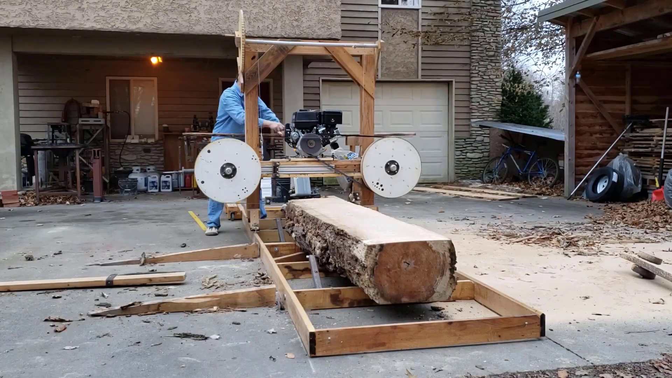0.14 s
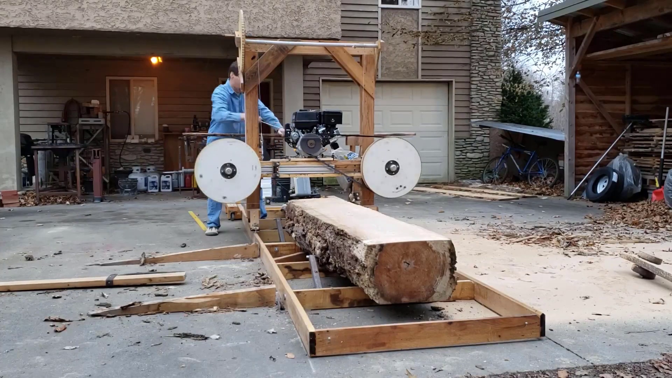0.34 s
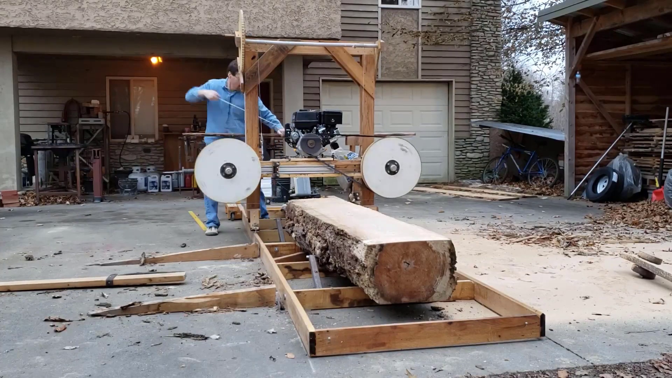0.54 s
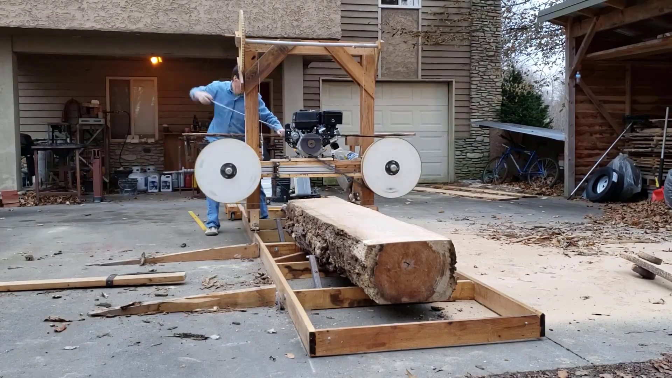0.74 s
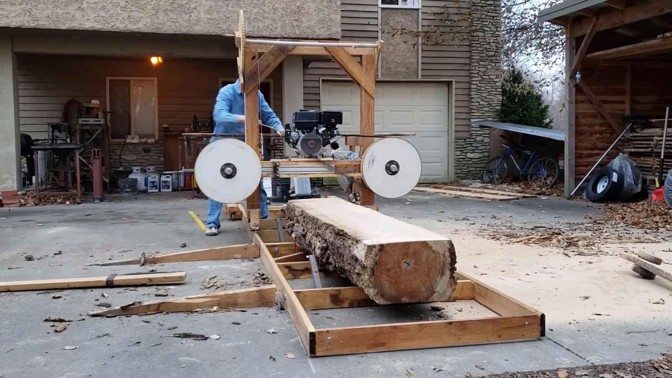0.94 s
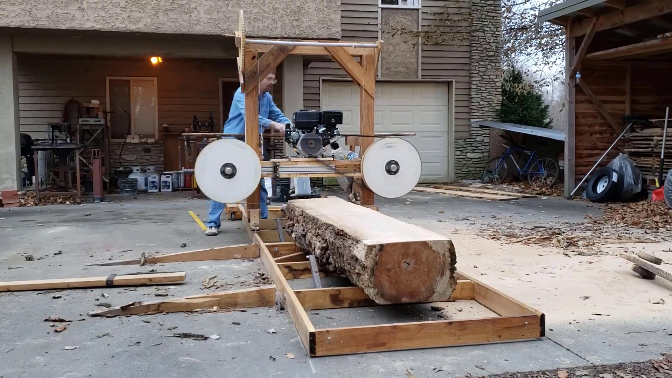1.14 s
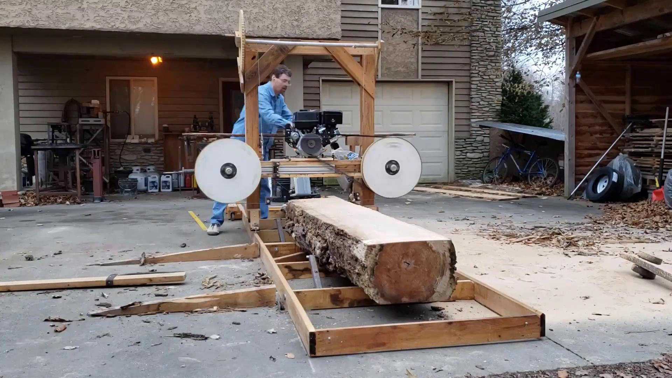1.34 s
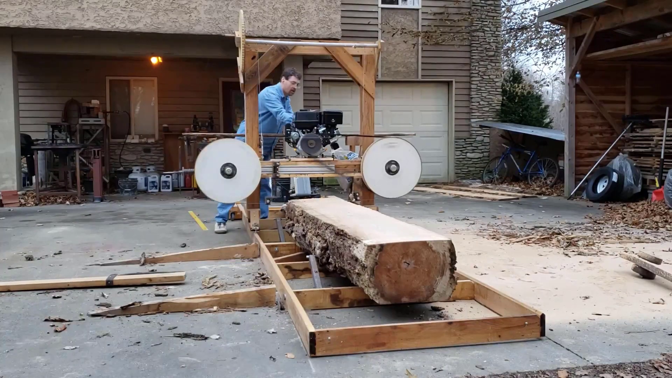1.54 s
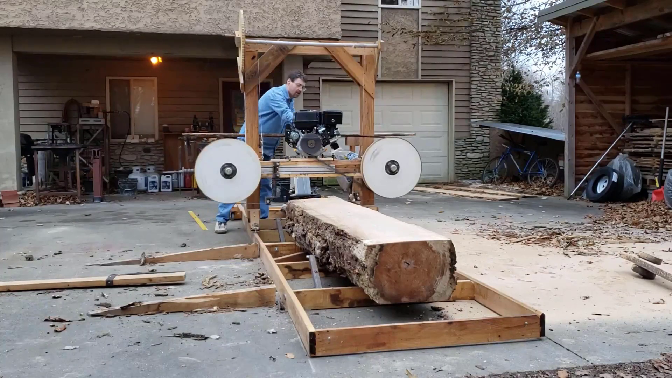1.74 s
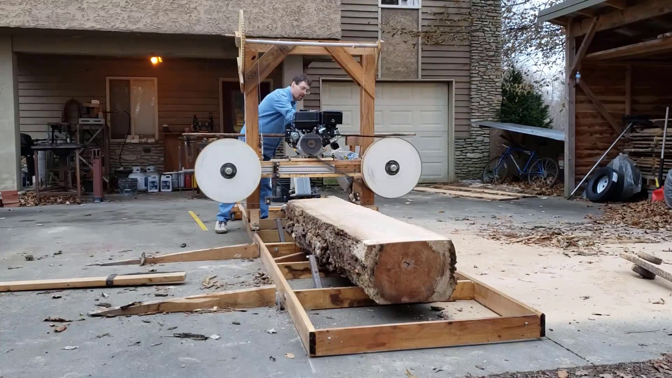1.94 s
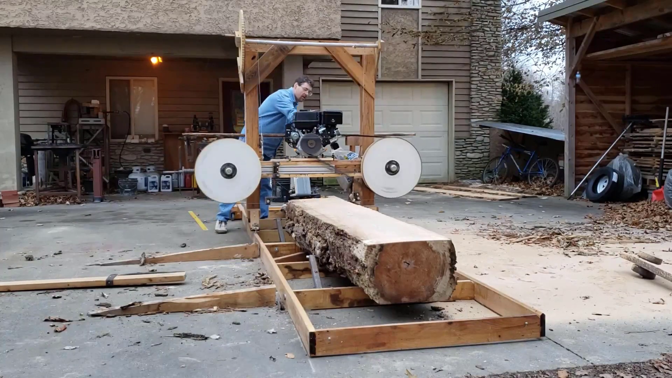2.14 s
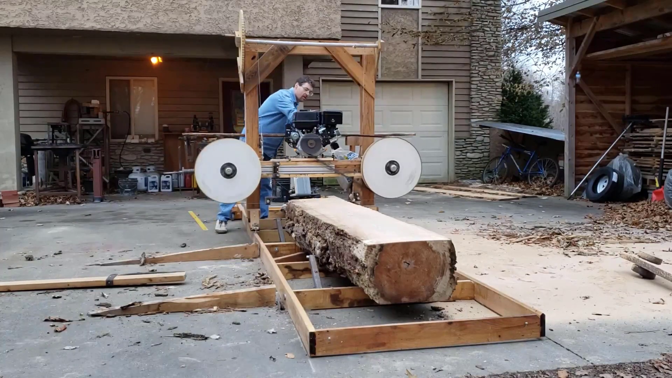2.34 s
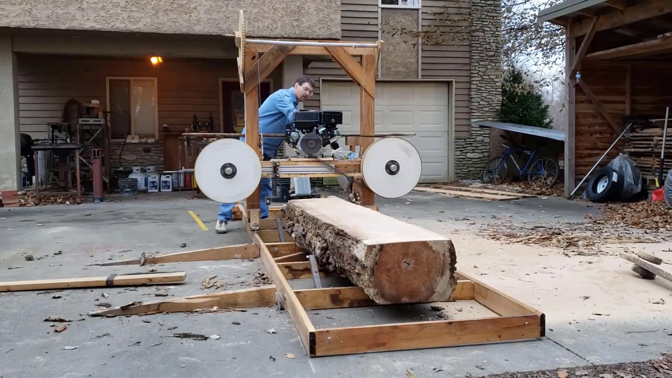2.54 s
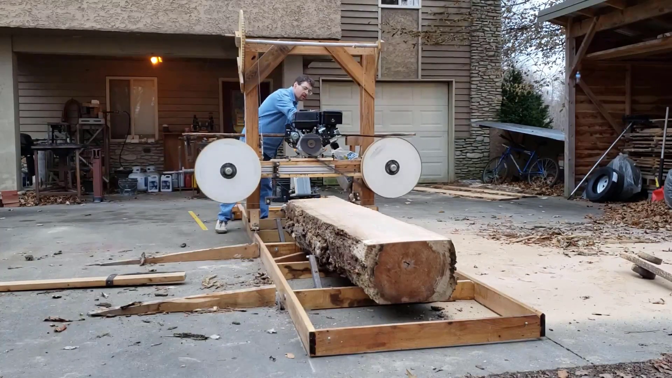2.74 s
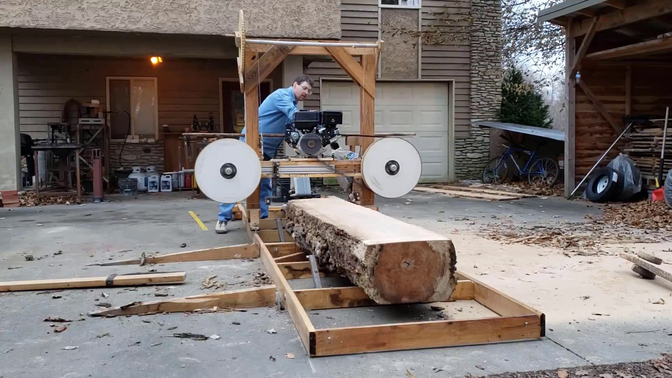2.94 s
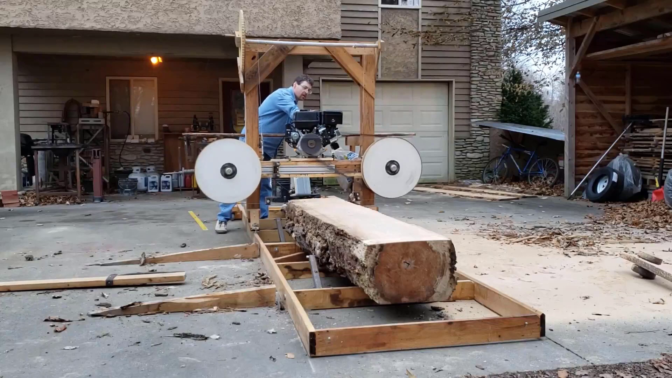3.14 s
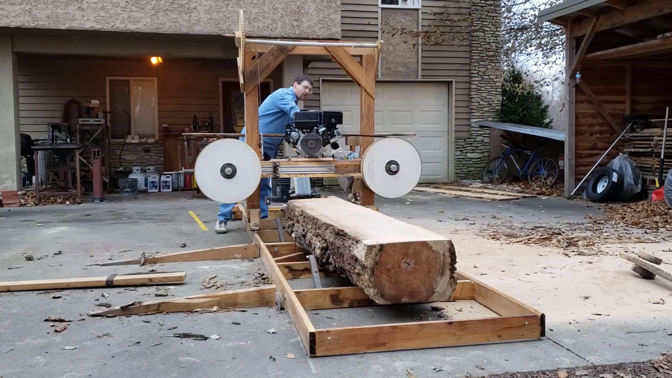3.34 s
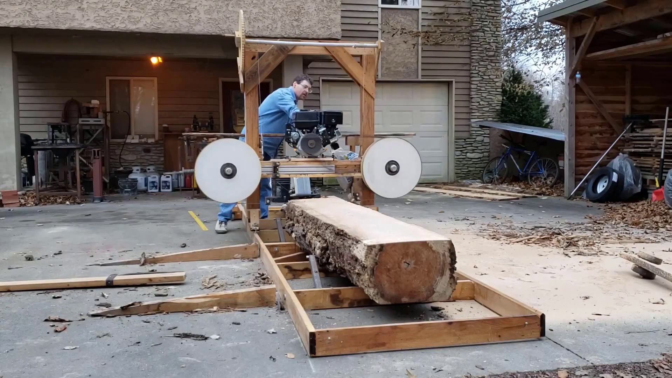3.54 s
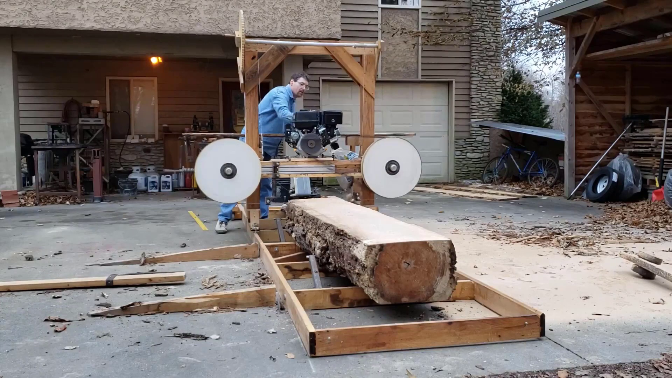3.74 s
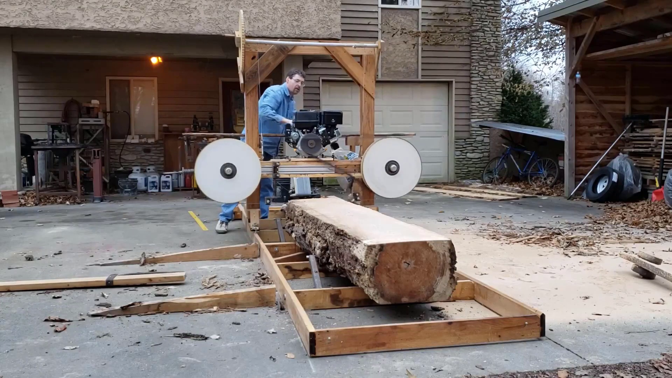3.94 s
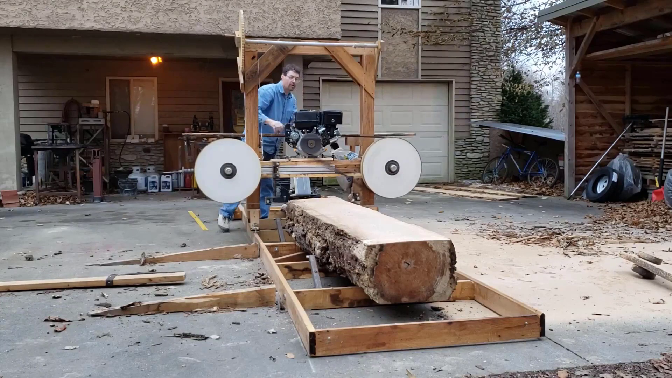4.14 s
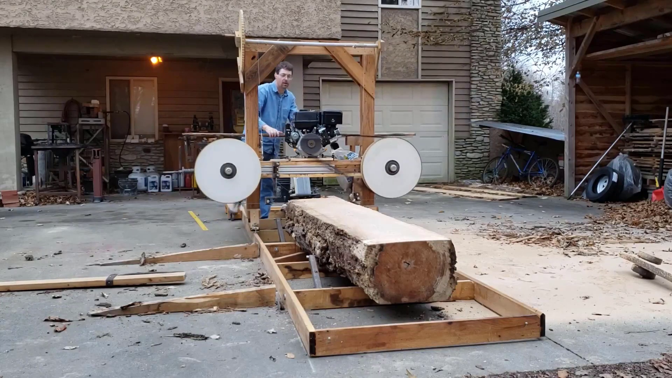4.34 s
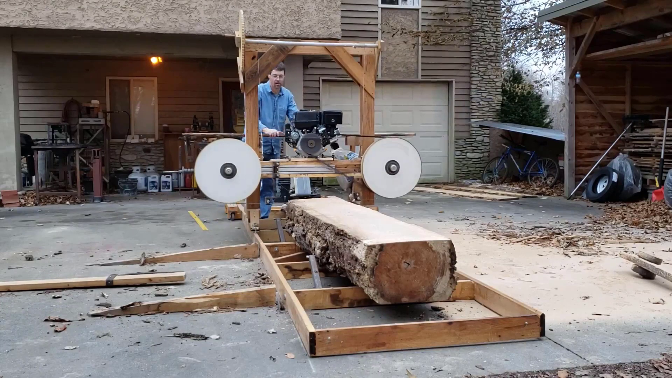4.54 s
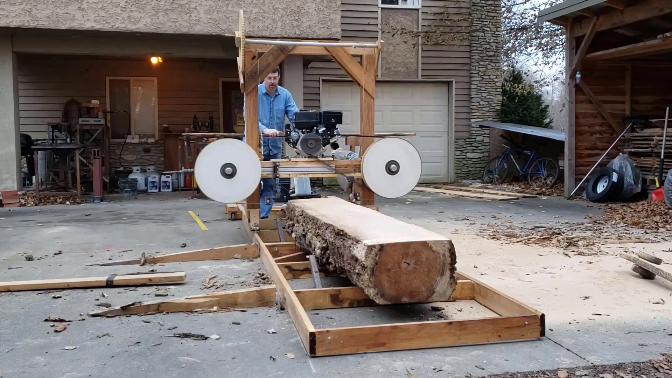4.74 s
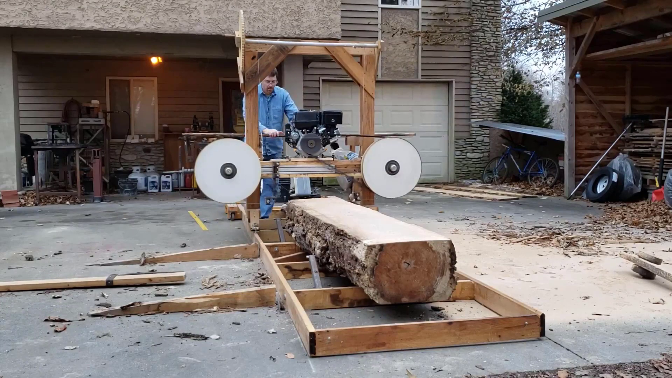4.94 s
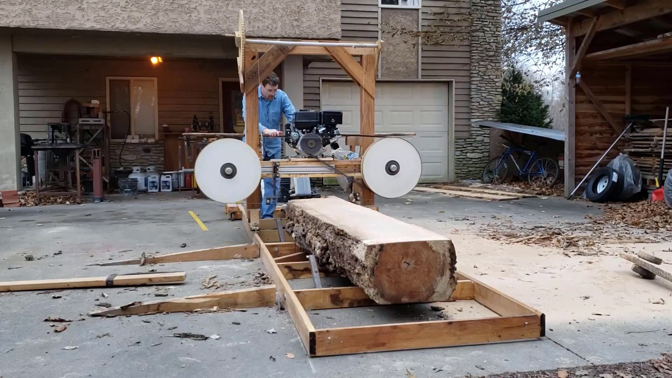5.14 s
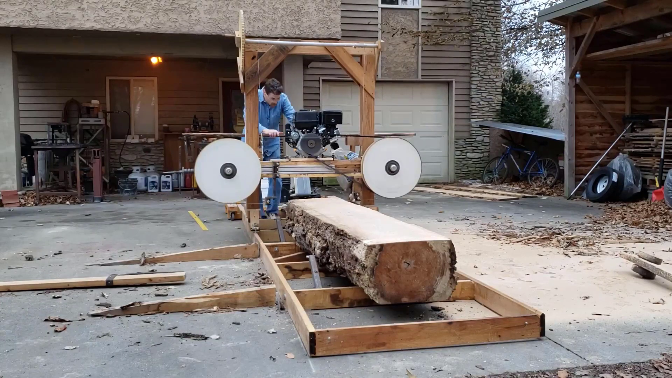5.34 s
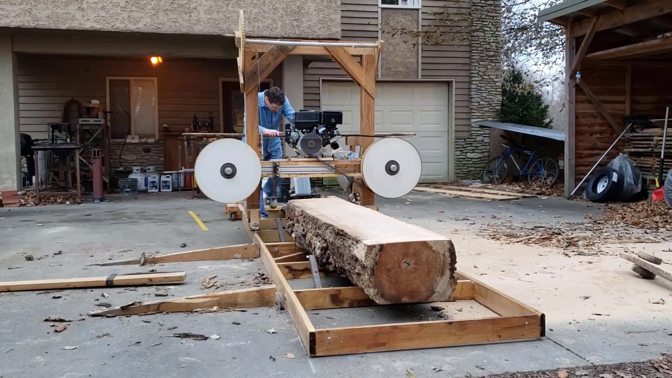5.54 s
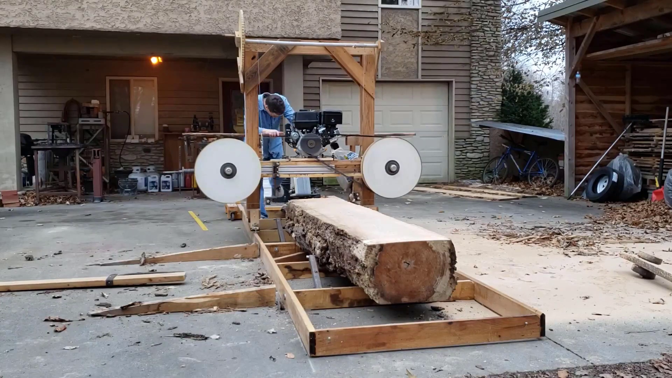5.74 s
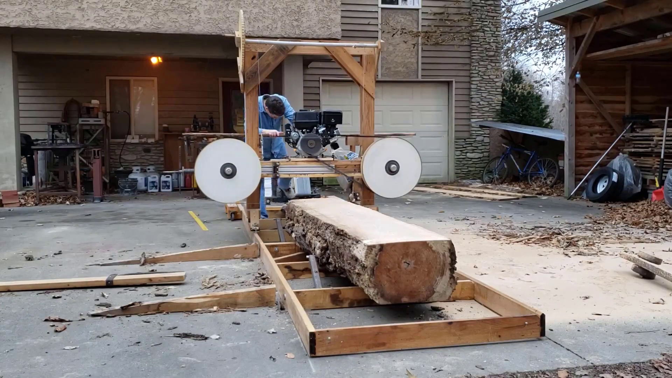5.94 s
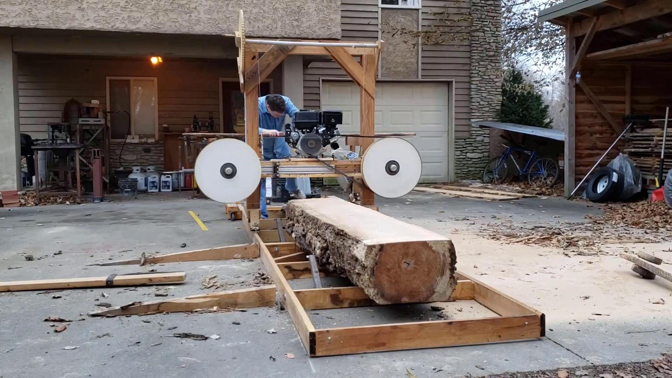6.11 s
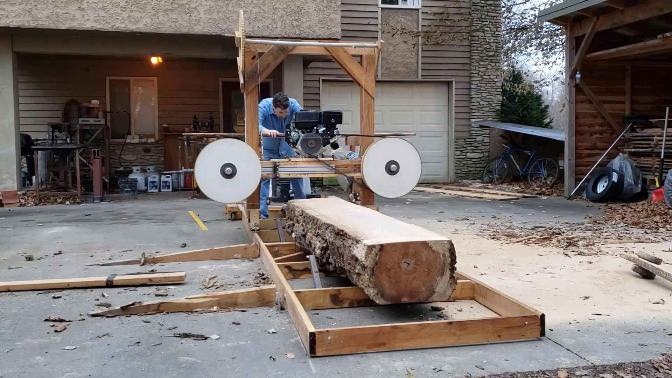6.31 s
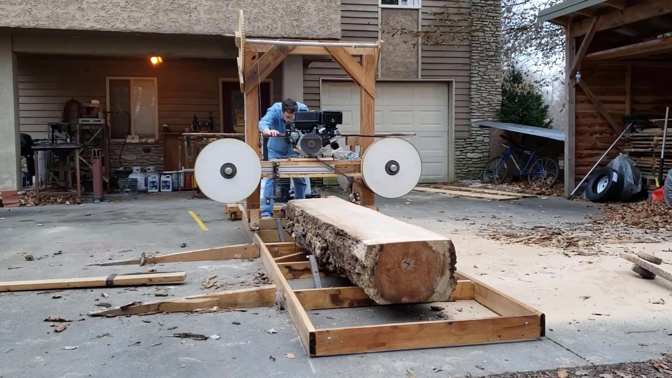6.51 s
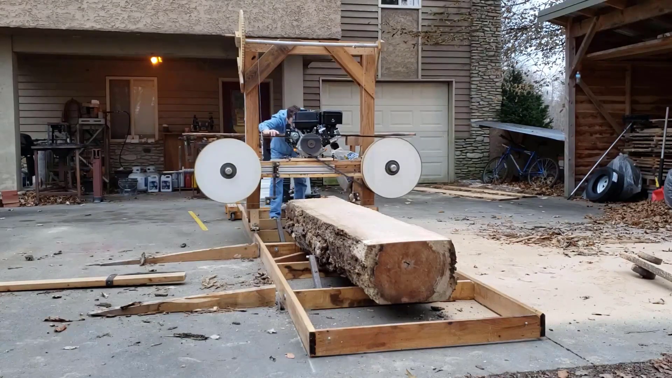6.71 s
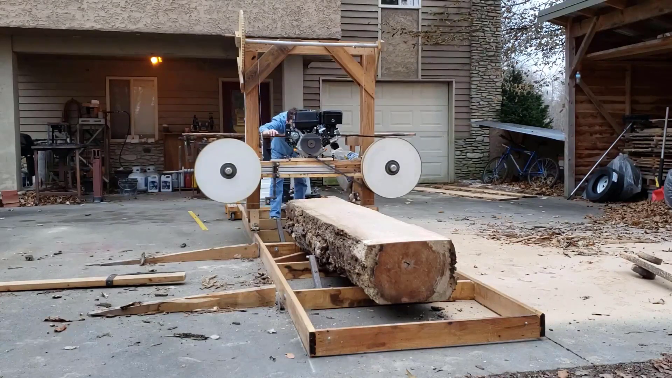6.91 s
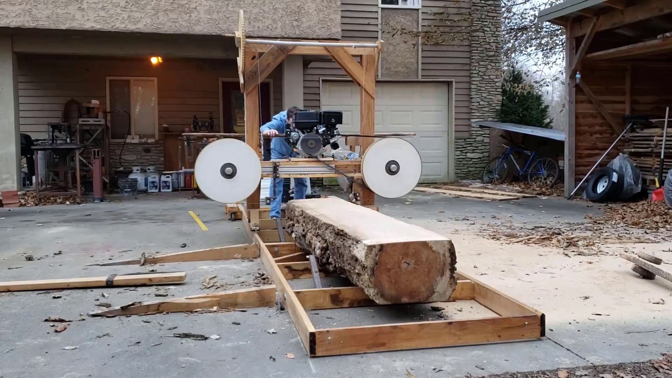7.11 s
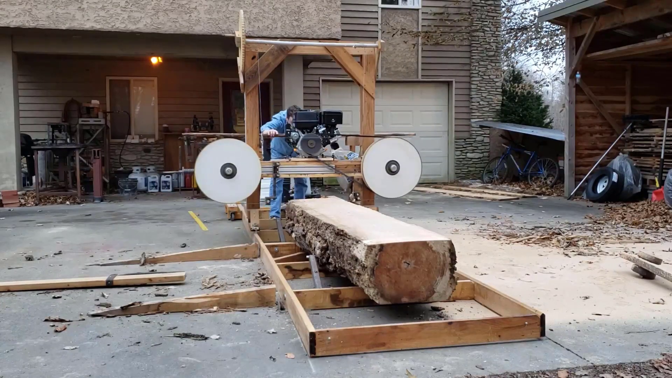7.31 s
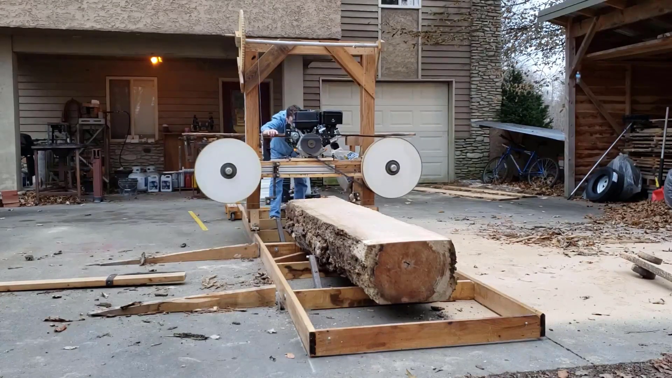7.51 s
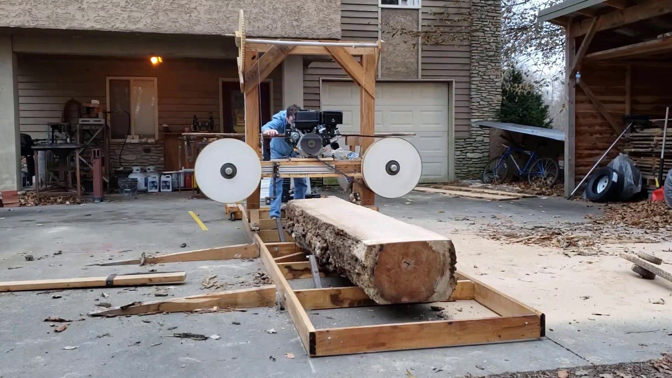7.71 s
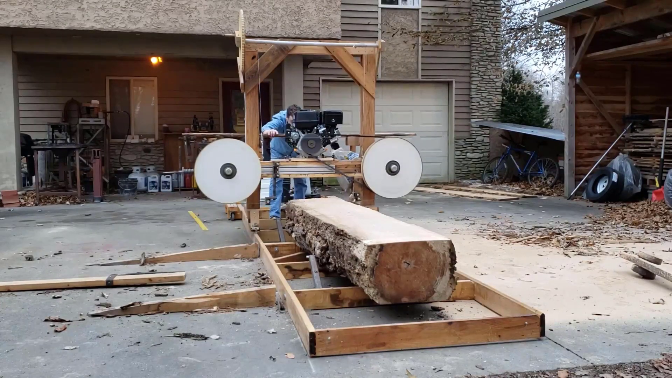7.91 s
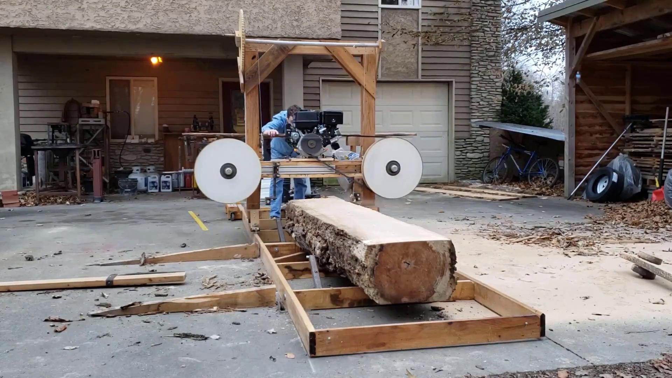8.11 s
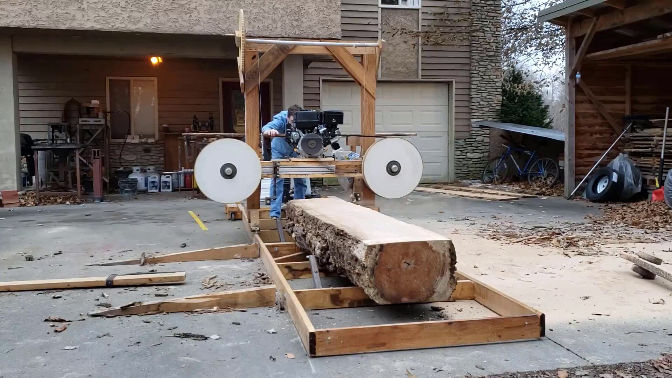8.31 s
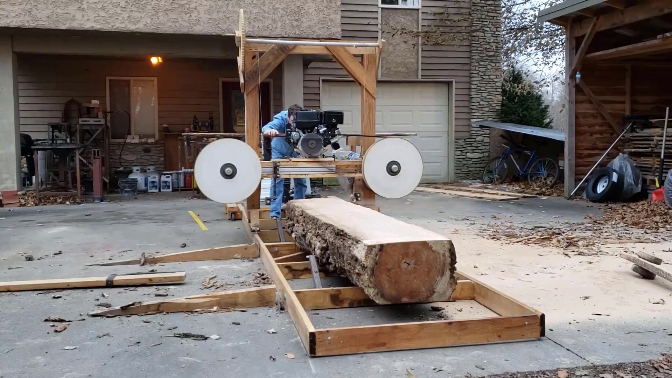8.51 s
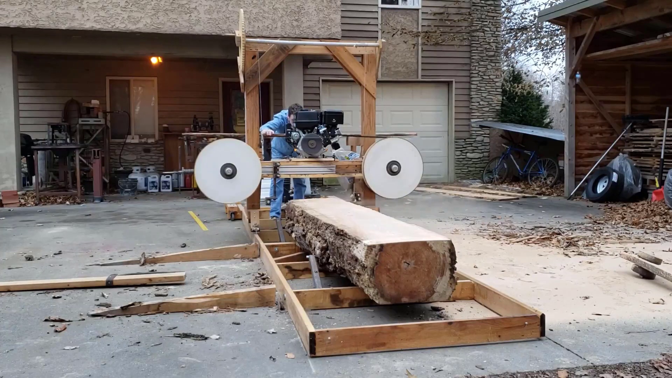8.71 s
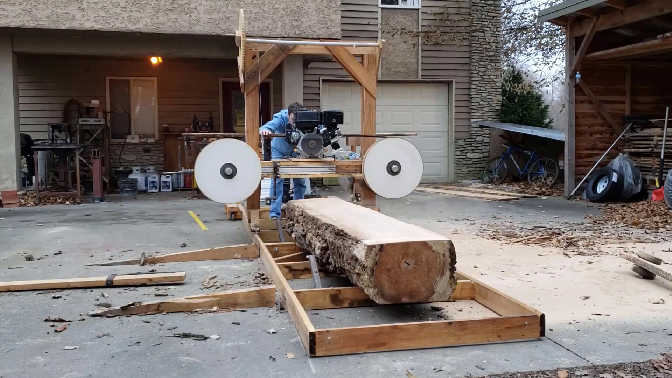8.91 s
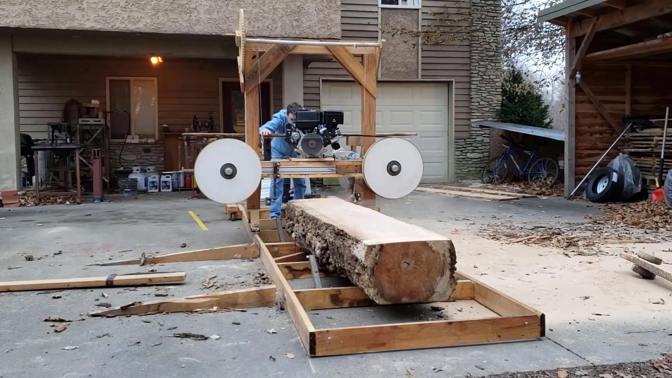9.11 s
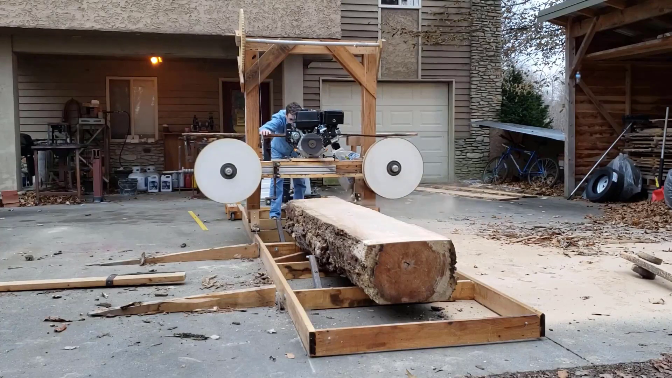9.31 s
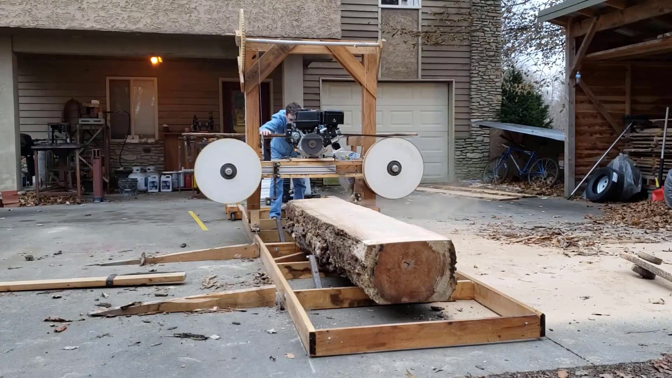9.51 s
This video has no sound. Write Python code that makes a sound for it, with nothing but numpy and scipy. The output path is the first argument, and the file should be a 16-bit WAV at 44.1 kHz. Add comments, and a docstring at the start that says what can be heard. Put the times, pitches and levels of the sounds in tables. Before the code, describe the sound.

Starter clicks and reel squeals, then a small engine catches in an open yard, hissing brightly over an uneven, then even, low exhaust hum.

```python
"""A small four-stroke engine on a sawmill is pull-started in a paved yard, some metres from the microphone.
The starter clicks, a bright hiss swells, the engine catches and stumbles, settles to an even beat and sags again.
Exhaust and intake puffs ring the muffler as a low hum; shaped noise makes the fan roar and the airy hiss.
A spinning cord reel whirrs and squeals, and faint outdoor rumble and a steady low hum lie underneath."""
import sys
import numpy as np
from scipy import signal
from scipy.fft import rfft, irfft
from scipy.io import wavfile

SR = 44100
rng = np.random.default_rng(int(sys.argv[2]) if len(sys.argv) > 2 else 0)


def transcribe(u):
    """Save the signal u as a 16-bit wav file named by the first command-line argument.

    u: samples, shape (n,) or (channels, n), limited to [-1, 1]; the rate is SR.
    q: integer samples, one column per channel.
    """
    v = np.clip(np.atleast_2d(u).T, -1, 1)
    q = np.round(v * 32767).astype(np.int16)
    wavfile.write(sys.argv[1], SR, q)


N = 426006
T = np.arange(N) / SR
FREQS = np.maximum(np.fft.rfftfreq(N, 1 / SR), 1)

# the cord is pulled, the fan begins to spin up, the first charge fires
PULL_S, SPIN_S, CATCH_S = 0.266, 0.38, 0.77

# mean firing rate of the engine: [t/s, f/Hz]
FIRING_RATE = [(3.3, 17.8), (3.6, 18.1), (3.81, 18.6), (3.91, 19.3), (4.42, 22.05), (4.7, 22.08),
               (5.1, 21.92), (6.4, 22.08), (6.91, 22.1), (7.93, 21.9), (8.16, 21.3), (8.42, 19.4),
               (9.05, 21.05), (9.66, 19.7)]
# how uneven the firing is: [t/s, raggedness 0-1]
RAGGEDNESS = [(3.3, 1), (3.8, .9), (4.0, .75), (4.45, .26), (8.0, .21), (8.4, .8), (9.66, .8)]
# exhaust hum once the engine has caught, before trim: [t/s, level/dB]
EXHAUST_LEVEL = [(0.8, -50.5), (2.0, -50), (2.75, -49), (3.15, -49), (3.7, -43.5), (4.1, -49),
                 (4.55, -46.5), (5.2, -45), (7.85, -43), (8.1, -44), (8.35, -49), (8.65, -47), (9.1, -52),
                 (9.66, -48.5)]
# second puff of each cycle against the main one, stronger than it only late on: [t/s, level/dB]
AFTERPUFF_LEVEL = [(4.5, -12), (5.4, -9.5), (6.2, -10), (8.0, -13), (8.4, 2)]
# muffler passband under even firing, relative: [f/Hz, level/dB]
EVEN_MUFFLER = [(90, -55.5), (132, -31), (154, 5), (176, 8), (198, 6.5), (220, 7), (242, 0), (264, -9.5),
                (330, -49), (440, -22), (560, -66.5)]
# muffler passband under ragged firing, relative: [f/Hz, level/dB]
RAGGED_MUFFLER = [(70, -47.5), (120, -19), (150, -2), (175, -0.5), (210, 4.5), (240, -2), (275, -8),
                  (330, -24), (430, -15), (600, -49)]
# rushing air of the running engine, before trims: [t/s, roar level/dB, hiss level/dB]
AIR_LEVEL = [(0.8, -49.5, -32), (1.7, -49, -30.5), (3.1, -49, -30.0), (3.5, -47, -29), (3.88, -46.5, -29),
             (4.17, -50.5, -31), (4.55, -48.5, -30), (5.85, -49.5, -32), (6.6, -49, -31),
             (7.8, -49.5, -32.5), (8.3, -48, -29.5), (8.65, -47, -30), (9.0, -48, -29.5),
             (9.66, -49.0, -31)]
# spectrum of the roar, relative: [f/Hz, level/dB]
ROAR_SPECTRUM = [(20, -2), (60, -2), (125, 0), (300, -2), (430, -2.5), (600, -2), (1000, -2), (1450, 0),
                 (2300, -2.5), (4000, -3), (7000, -23.5), (16000, -7)]
# likeness of left and right in the roar: [f/Hz, likeness 0-1]
ROAR_LIKENESS = [(30, 0.04), (150, 0.63), (400, 0.36), (700, 0.23), (1000, 0.22), (1350, 0), (2000, 0.11),
                 (6000, 0.01)]
# spectrum of the hiss wash, relative: [f/Hz, level/dB]
HISS_SPECTRUM = [(1200, -31), (2600, -19.5), (4000, -16.5), (5200, -11.5), (6300, -11), (7900, -5.5),
                 (8600, -9), (10100, -1), (11500, -4.5), (12300, 1.5), (13200, 0), (14300, 1.5),
                 (15700, -1)]
# whistling bands of the direct hiss, relative, before they drift: [f/Hz, width/Hz, level/dB]
WHISTLE_BANDS = [(5850, 5500, -5.5), (8640, 640, -2), (9230, 720, -2.5), (10670, 600, -3.5),
                 (11220, 260, -1.5), (11620, 130, -7.5), (11660, 160, -3.5), (13130, 400, 0),
                 (13760, 270, -7.5), (13350, 280, -4.5), (14600, 300, -7), (15000, 700, -3)]
# outdoor air, relative: [f/Hz, level/dB]
YARD_SPECTRUM = [(25, -2), (70, 1), (120, -9), (300, -7), (450, -13), (800, -14), (1300, -22), (4000, -26),
                 (15000, -31)]
# snaps of the starter pawls, relative: [t/s, level/dB]
PAWL_CLICKS = [(.217, -47), (.243, -51), (.260, -47), (.288, -30), (.311, -47)]
# spectrum of a pawl snap, relative: [f/Hz, level/dB]
PAWL_SPECTRUM = [(150, -25), (400, -15), (1150, -1), (2100, -12), (3000, -6), (4000, -13), (5000, -6),
                 (7500, -5), (10000, 3.5), (15000, 4)]
# reel housing resonances at full spin, relative: [f/Hz, width/Hz, level/dB]
REEL_RESONANCES = [(483, 76, -0.5), (680, 260, -1), (930, 150, -0.5), (1420, 520, 1.5), (1850, 450, -4)]
# squeals of the reel: [t/s, half length/s, f/Hz, glide/(Hz/s), level/dB]
REEL_SQUEALS = [(.31, .03, 1190, 1800, -70), (.41, .08, 910, -600, -68), (.52, .04, 460, -100, -63),
                (.51, .08, 1390, 700, -64), (.49, .07, 1850, 600, -67), (.59, .04, 890, 0, -66),
                (.63, .07, 1780, -200, -64), (.66, .07, 1440, 0, -63), (.98, .13, 1440, -150, -59),
                (1.4, .2, 1390, -60, -63)]
# hard single firings: [t/s, peak level/dB, f/Hz at the peak]
COUGH_THUMPS = [(.803, -35, 205), (.822, -36, 178), (.867, -38, 192), (0.941, -43, 175), (1.03, -35, 221),
                (1.062, -42, 215), (1.094, -40, 215), (1.203, -36, 215), (1.246, -40, 216),
                (1.28, -41, 220), (1.357, -39, 173), (1.446, -38, 201), (1.483, -41, 165), (1.58, -42, 180),
                (1.751, -38, 200), (1.821, -39, 180), (1.895, -40, 195), (2.175, -41, 196),
                (2.205, -41, 196), (2.309, -41, 194), (2.425, -39, 185), (2.487, -42, 205),
                (2.642, -36, 188), (2.712, -39, 226), (2.853, -38, 188), (3.041, -41, 209),
                (3.128, -40, 201), (3.275, -39, 200), (3.374, -35, 203), (3.594, -36, 190)]
# harmonics of the firing rate booming in the muffler, before trim: [t/s, half length/s, harmonic, level/dB]
HARMONIC_BOOMS = [(3.29, .06, 12, -52), (3.45, .055, 11, -43), (3.485, .04, 12, -43),
                  (3.565, .035, 12, -47), (3.61, .06, 11, -44), (3.66, .035, 12, -45.5),
                  (3.755, .045, 9, -46.5), (3.77, .045, 12, -45.5), (3.845, .045, 10, -43.5),
                  (3.96, .08, 9, -46.5), (4.04, .07, 10, -49.5), (4.09, .08, 9, -44.5), (4.19, .08, 8, -50),
                  (4.32, .07, 10, -47.5), (8.1, .07, 9, -45), (8.23, .1, 8, -53), (8.31, .06, 9, -51),
                  (8.44, .06, 10, -51.5), (8.54, .05, 10, -50.5), (8.6, .12, 11, -50.5),
                  (8.67, .15, 9, -46), (8.78, .07, 10, -54), (8.87, .14, 8, -48.5), (9.03, .07, 8, -51),
                  (9.05, .07, 7, -54), (9.38, .25, 8, -57), (9.61, .05, 10, -46.5), (9.61, .05, 11, -51)]
# whistles in the hiss, and one brief metallic click at 5.34 s: [t/s, f/Hz, width/Hz, half length/s, level/dB]
HISS_FLARES = [(4.85, 13100, 220, .1, -47), (5.34, 3450, 600, .013, -47), (5.39, 8520, 350, .06, -44),
               (5.43, 9100, 400, .022, -42), (5.37, 11750, 250, .1, -44), (5.4, 13200, 300, .1, -42),
               (6.7, 11750, 300, .45, -45), (7.15, 13300, 220, .13, -41), (7.75, 13270, 220, .1, -47)]


def undb(db):
    """Decibels to gain."""
    return 10 ** (np.asarray(db) / 20)


def curves(table):
    """Each column of a table, joined by straight lines in time."""
    s, *columns = np.transpose(table)
    return [np.interp(T, s, c) for c in columns]


def on_freqs(table):
    """A (frequency, value) table joined up on a log-frequency axis."""
    hz, value = np.transpose(table)
    return np.interp(np.log(FREQS), np.log(hz), value)


def since(s):
    """Seconds gone since a moment, zero before it."""
    return np.maximum(T - s, 0)


def ramp(s, length_s=0.02):
    """Rises from 0 to 1, starting at a moment."""
    return np.minimum(since(s) / length_s, 1)


def shape(x, gain):
    """Filter by a gain for each frequency."""
    return irfft(rfft(x) * gain, N)


def causal(gain):
    """Minimum-phase response of a resonator with this gain: it rings only after the blow."""
    cepstrum = irfft(np.log(gain), N)
    return np.exp(rfft(cepstrum * (1 + np.sign(np.fft.fftfreq(N)))))


def unit(x, band=(0, SR)):
    """Scale so that the centre of the image has rms 1 within a band in Hz."""
    mid = np.atleast_2d(x).mean(axis=0)
    in_band = (FREQS >= band[0]) & (FREQS <= band[1])
    return x / np.std(shape(mid, in_band))


def noise(channels=1):
    """Unrelated white noises."""
    return rng.standard_normal((channels, N))


def walk(rate):
    """Smooth chance with spread 1, changing about rate times a second."""
    return unit(shape(noise()[0], np.exp(-(FREQS / rate) ** 2) * (FREQS > 1)))


def spikes(times, sizes):
    """One impulse at each time."""
    places = np.clip(np.asarray(times) * SR, 0, N - 1).astype(int)
    return np.bincount(places, sizes, N)


def resonance(hz, width):
    """Noise in one resonance, rms 1; its gain halves half a width from the centre."""
    return unit(shape(noise()[0], 1 / (1 + ((FREQS - hz) / width * 2) ** 2)))


def steadied(x, share=0.35, span_s=0.019):
    """Even out a share of the chance swells of a narrow noise."""
    power = shape(x ** 2, np.exp(-(FREQS * span_s) ** 2))
    return unit(x / np.maximum(power, power.mean() / 20) ** (np.clip(share, 0, 1) / 2))


def drift(x, drift_hz=55, rate=1.497):
    """Let all pitches of a sound wander slowly up and down together."""
    turns = np.cumsum(drift_hz * walk(rate)) / SR
    return np.real(signal.hilbert(x) * np.exp(2j * np.pi * turns))


def crank(hunt_hz=.1, hunt_rate=4.8, beat_s=6.316):
    """Firing cycles of two crank turns each; the governor hunts a little about the mean rate."""
    hz, = curves(FIRING_RATE)
    turn = np.cumsum(hz + hunt_hz * walk(hunt_rate)) / SR
    return turn - np.interp(beat_s, T, turn)  # a firing lands on beat_s


def exhaust(turn, rough, intake=0.069, scatter_db=0.5, after_s=.0177, after_scatter_db=1.5,
            stumble_s=0.00403, ragged_db=-4.0, flow=2.05):
    """Each cycle gives an exhaust puff, an afterpuff and, one crank turn on, a weak intake puff; all ring the muffler."""
    fired = T[1:][np.diff(np.floor(turn)) > 0]
    drawn = T[1:][np.diff(np.floor(turn + .5)) > 0]
    main_chance, late_chance, ragged_chance, after_chance = rng.standard_normal((4, len(fired)))

    after_db = np.interp(fired, *np.transpose(AFTERPUFF_LEVEL))
    share = 1 / np.hypot(1, undb(after_db))  # the pair keeps its energy
    puffs = spikes(fired, share * undb(scatter_db * main_chance))
    puffs = puffs + spikes(fired + after_s, share * undb(after_db + after_scatter_db * after_chance))
    puffs = puffs + spikes(drawn, np.full(len(drawn), intake))
    even = unit(shape(puffs, causal(undb(on_freqs(EVEN_MUFFLER)))))

    # ragged firings come early or late, weak or strong, with turbulent gas between them
    stumbles = spikes(fired + stumble_s * late_chance, undb(ragged_db * ragged_chance))
    gas = unit(stumbles) + flow * noise()[0]
    ragged = steadied(shape(gas, causal(undb(on_freqs(RAGGED_MUFFLER)))))
    return np.sqrt(1 - rough ** 2) * even + rough * ragged


def hum_level(rest_db=-60.5, crank_db=-52.5):
    """The exhaust in dB before trim: soft puffs while cranked, then firing."""
    cranked_db = rest_db + (crank_db - rest_db) * ramp(PULL_S)
    return cranked_db + (curves(EXHAUST_LEVEL)[0] - cranked_db) * ramp(CATCH_S)


def roar(flicker_db=1.16):
    """Rush of the cooling fan and machinery, spread wide by the yard."""
    alike = np.clip(on_freqs(ROAR_LIKENESS), 0, 1)
    air = shape(noise(), np.sqrt(alike)) + shape(noise(channels=2), np.sqrt(1 - alike))
    return unit(shape(air, undb(on_freqs(ROAR_SPECTRUM))), (400, 2500)) * undb(flicker_db * walk(23))


def hiss(turn, hum, direct_db=-5.0, wander_db=1.0, throb_db=0.2, pulse_db=0.43, flutter_db=0.72, grain_db=0.1,
         edge_cold_db=-4.5, edge_warm_db=0.63, warm_s=2):
    """Turbulent air: wavering whistle bands in the centre, a smooth wash from the walls around them."""
    direct = 0
    for hz, width, db in WHISTLE_BANDS:
        direct = direct + resonance(hz, width) * undb(db + wander_db * walk(3.4))
    direct = unit(drift(direct) * undb(grain_db * walk(700)))
    wash = unit(shape(noise(channels=2), undb(on_freqs(HISS_SPECTRUM))))
    air = wash + undb(direct_db) * direct

    # the top edge, faded in from 11 to 13 kHz, opens as the engine warms
    edge = shape(air, np.clip((FREQS - 11000) / 2000, 0, 1))
    edge_db = edge_warm_db + (edge_cold_db - edge_warm_db) * np.exp(-T / warm_s)
    air = air + (undb(edge_db) - 1) * edge

    # the stream swells with each crank turn and with the pressure in the muffler
    swell_db = throb_db * np.cos(2 * np.pi * 2 * turn) + pulse_db * hum + flutter_db * walk(20.6)
    return unit(air * undb(swell_db), (6000, 16000))


def spin_up(rest_db, pull_db, rise_s):
    """The air in dB against its running level: it swells after the pull and arrives as the engine catches."""
    pulled_db = pull_db * np.exp(-since(SPIN_S) / rise_s)
    cranked_db = rest_db + (pulled_db - rest_db) * ramp(PULL_S)
    return cranked_db * (1 - ramp(CATCH_S))


def reflections(x, echo_db=-24, longest_s=.022, count=12):
    """Short echoes from ground and frame comb each channel in its own way."""
    lags = (rng.uniform(.1, 1, (len(x), count)) * longest_s * SR).astype(int)
    echoes = [sum(np.pad(c, (k, 0))[:N] for k in row) for c, row in zip(x, lags)]
    return x + undb(echo_db) * np.array(echoes)


def rushing_air(turn, hum, roar_trim_db=-0.93, hiss_trim_db=0.18, kick_s=0.029):
    """Roar and hiss swell with the spinning fan, the roar sooner; the first firing kicks the fan."""
    roar_db, hiss_db = curves(AIR_LEVEL)
    kick = ramp(CATCH_S) * np.exp(-since(CATCH_S + kick_s) / kick_s)
    roar_db = roar_db + roar_trim_db + spin_up(rest_db=-40, pull_db=-30, rise_s=0.12) + 2.5 * kick
    hiss_db = hiss_db + hiss_trim_db + spin_up(rest_db=-50, pull_db=-33.5, rise_s=0.2) + 3.5 * kick
    return reflections(undb(roar_db) * roar() + undb(hiss_db) * hiss(turn, hum))


def low_hum(hz=120, db=-69, waver_db=1.0):
    """A faint sine, wavering in level and phase, lies under everything."""
    tone = np.sin(2 * np.pi * hz * T + walk(3) / 2)
    return undb(db + waver_db * walk(6)) * np.sqrt(2) * tone


def yard(db=-74.5):
    """Faint outdoor air, mostly rumble: shaped noise, largely alike on both sides."""
    air = noise(channels=2) + 3.9 * noise()
    return undb(db) * unit(shape(air, undb(on_freqs(YARD_SPECTRUM))), (400, 15000))


def starter(snap_s=0.0016, ring_s=0.018, ring_db=-16, click_db=-7):
    """The pawls snap into the flywheel cup, which rings briefly: noise under two decays."""
    envelope = 0
    for s, db in PAWL_CLICKS:
        age = since(s)
        decay = np.exp(-age / snap_s) + undb(ring_db) * np.exp(-age / ring_s)
        envelope = envelope + (T >= s) * undb(db) * decay
    snaps = envelope * (noise() + 1.4 * noise(channels=2))
    return undb(click_db) * shape(snaps, undb(on_freqs(PAWL_SPECTRUM)))


def reel(db=-57, attack_s=0.25, release_s=0.28, chatter_db=2.0, chatter_rate=70, jerk=0.254, glide=.08):
    """The cord jerks its reel into a spin; it chatters in the housing, and the whirr climbs and falls with the spin."""
    whirr = sum(undb(level_db) * resonance(hz, width) for hz, width, level_db in REEL_RESONANCES)
    whirr = whirr * undb(chatter_db * walk(chatter_rate))
    spin = jerk * ramp(PULL_S) + (1 - jerk) * ramp(PULL_S, attack_s) ** 2
    spin = spin * np.exp(-since(PULL_S + attack_s) / release_s)  # runs down as the cord winds back
    played_s = np.cumsum(1 - glide * (1 - spin)) / SR  # slower playback, lower pitch
    whirr = np.interp(played_s, T, whirr)
    return unit(whirr) * undb(db) * spin


def squeals(wobble=.9, wobble_rate=45):
    """The spinning reel sings in thin gliding tones, the last of them as the cord winds back."""
    out, wobbling = np.zeros(N), wobble * walk(wobble_rate)
    for s, length_s, hz, glide, db in REEL_SQUEALS:
        age = T - s
        phase = 2 * np.pi * (hz * age + glide * age ** 2 / 2) + wobbling
        out += undb(db) * np.exp(-(age / length_s) ** 2) * np.sqrt(2) * np.cos(phase)
    return out


def coughs(attack_s=0.0071, release_s=0.014, sag_hz_per_s=900):
    """A rich charge now and then thumps the muffler harder; each thump sinks in pitch as it fades."""
    out = np.zeros(N)
    for s, db, hz in COUGH_THUMPS:
        near = np.abs(T - s) < .06
        age = T[near] - s
        envelope = np.exp(-(age / np.where(age < 0, attack_s, release_s)) ** 2)
        cycles = hz * age - sag_hz_per_s * age ** 2 / 2 + rng.random()
        out[near] += undb(db) * envelope * np.cos(2 * np.pi * cycles)
    return out


def booms(turn, trim_db=0.3, waver=0.62, waver_rate=16):
    """One harmonic after another swells in the muffler, wavers and slides with the crank speed."""
    wavering, tones = waver * walk(waver_rate), 0
    for s, length_s, harmonic, db in HARMONIC_BOOMS:
        phase = 2 * np.pi * harmonic * turn + np.roll(wavering, rng.integers(N))
        tones = tones + undb(db + trim_db) * np.exp(-((T - s) / length_s) ** 2) * np.cos(phase)
    muffler = causal(undb(on_freqs(EVEN_MUFFLER)))
    delayed = shape(tones, muffler / np.abs(muffler))  # the muffler's phase without its gain
    return np.sqrt(2) * delayed * ramp(CATCH_S)


def flares():
    """Now and then a band of the hiss swells into a whistle; once a brief metallic click sounds."""
    out = 0
    for s, hz, width, length_s, db in HISS_FLARES:
        out = out + resonance(hz, width) * undb(db) * np.exp(-((T - s) / length_s) ** 2)
    return out


def scene(hum_trim_db=0.66, right_db=0.3):
    """The crank times the hum, the booms and the throb of the hiss; the air leans slightly to the right."""
    rough, = curves(RAGGEDNESS)
    turn = crank()
    hum = exhaust(turn, rough)
    engine = undb(hum_level() + hum_trim_db) * hum + coughs() + booms(turn)
    lean = undb(np.array([[-right_db], [right_db]]) / 2)
    air = (rushing_air(turn, hum) + flares()) * lean
    pull_start = starter() + reel() + squeals()
    return engine + air + pull_start + low_hum() + yard()


def record(dry, top_hz=15750):
    """The recorder cuts the top steeply with an elliptic low-pass."""
    return signal.sosfilt(signal.ellip(12, .1, 80, top_hz, fs=SR, output="sos"), dry)


dry = scene()
out = record(dry)
transcribe(out)
```